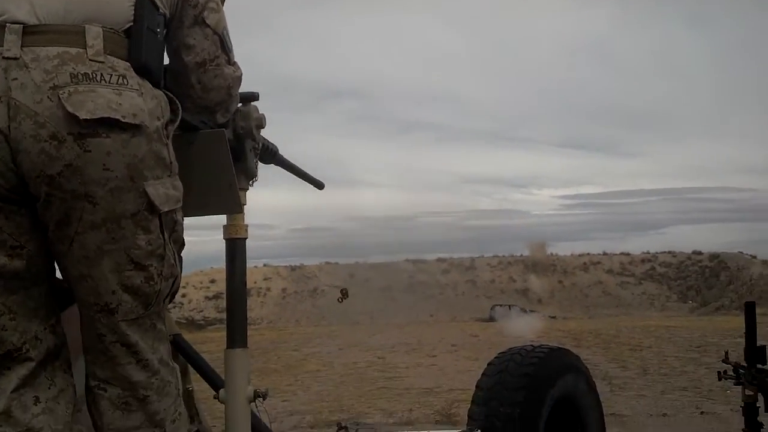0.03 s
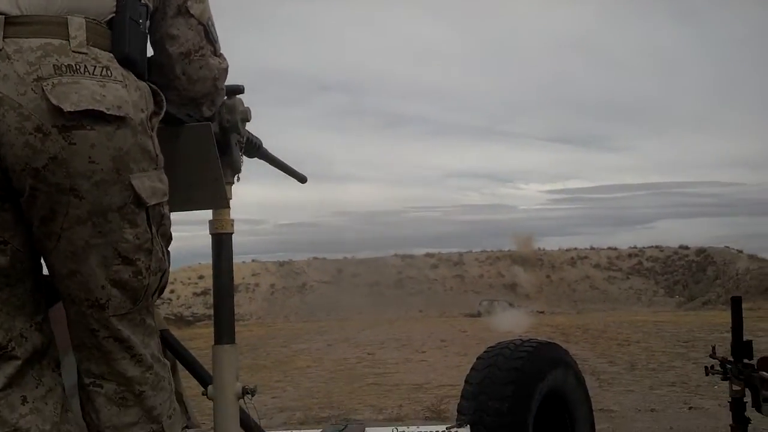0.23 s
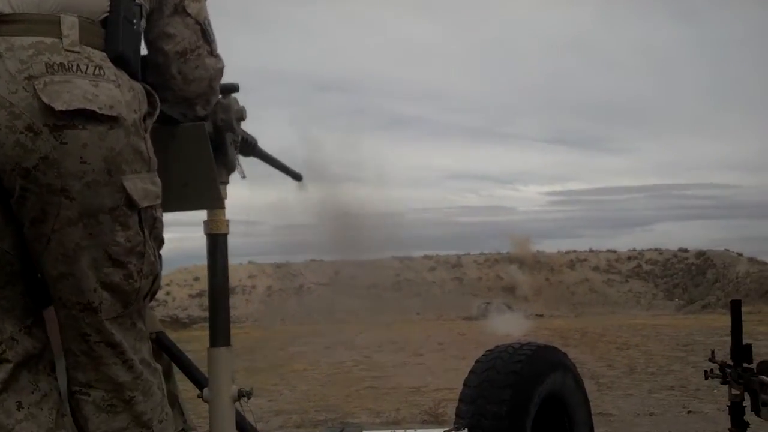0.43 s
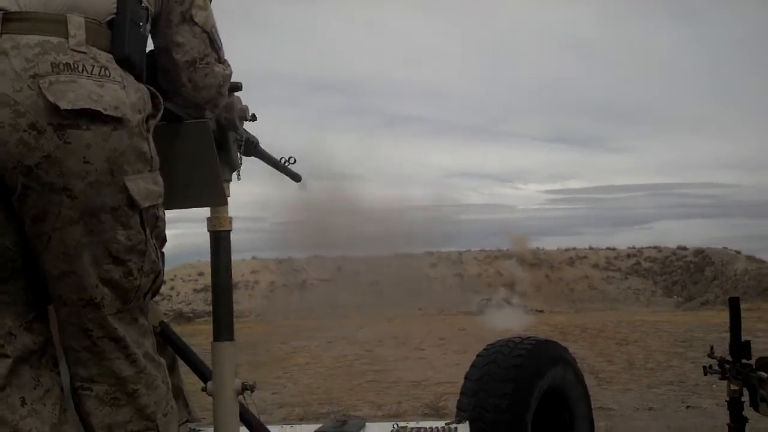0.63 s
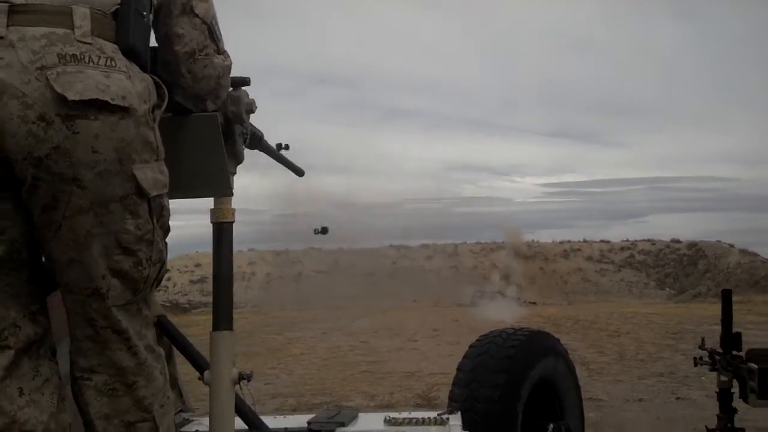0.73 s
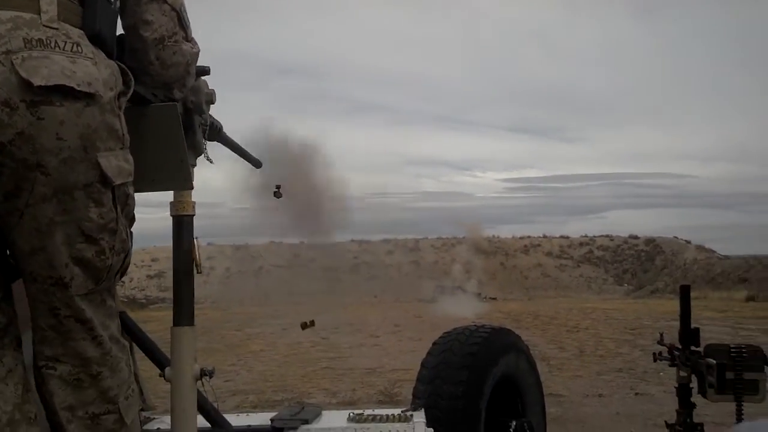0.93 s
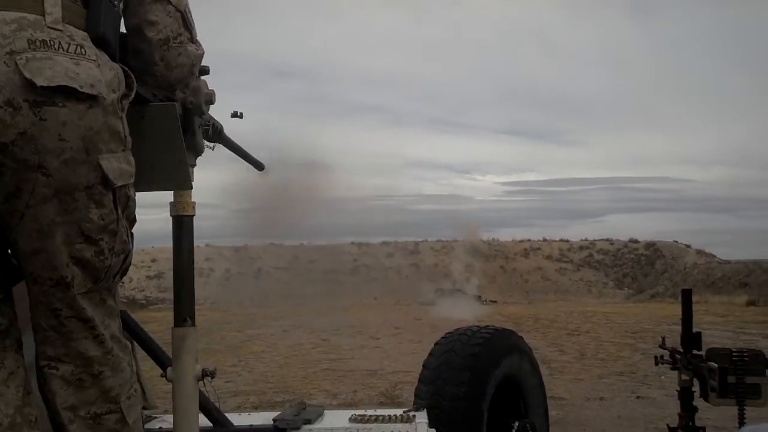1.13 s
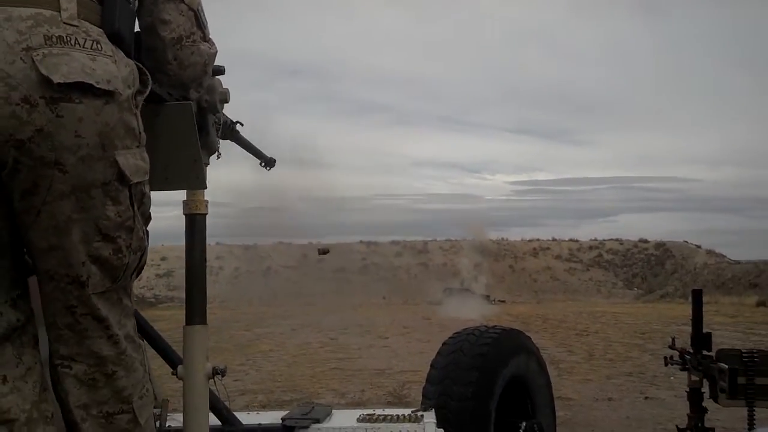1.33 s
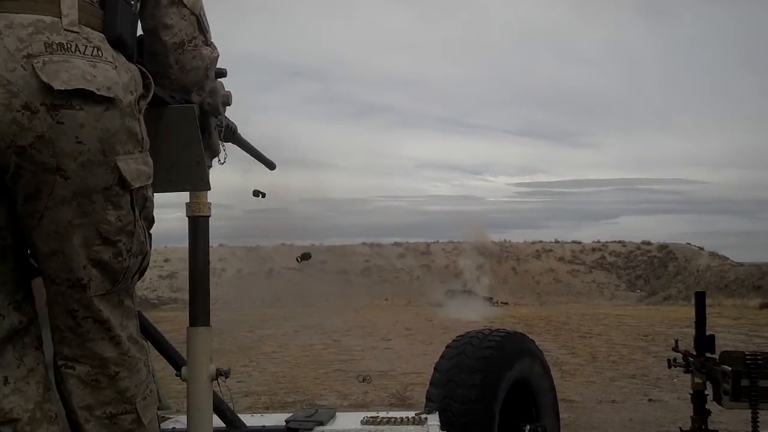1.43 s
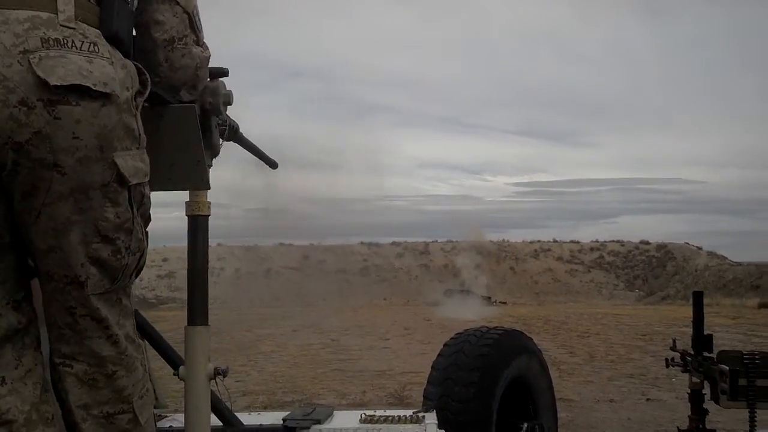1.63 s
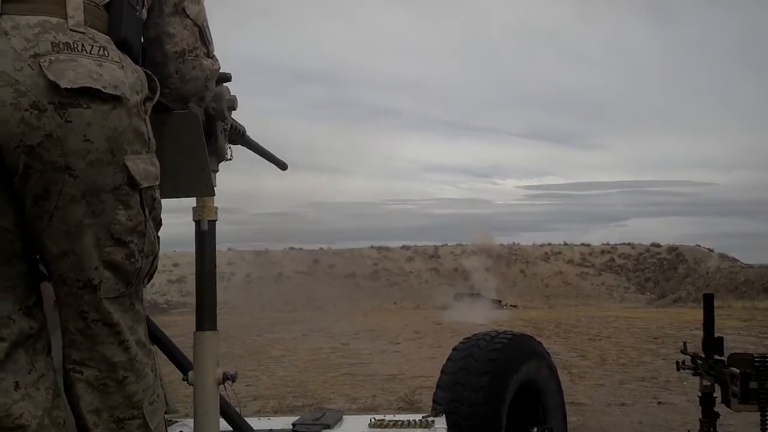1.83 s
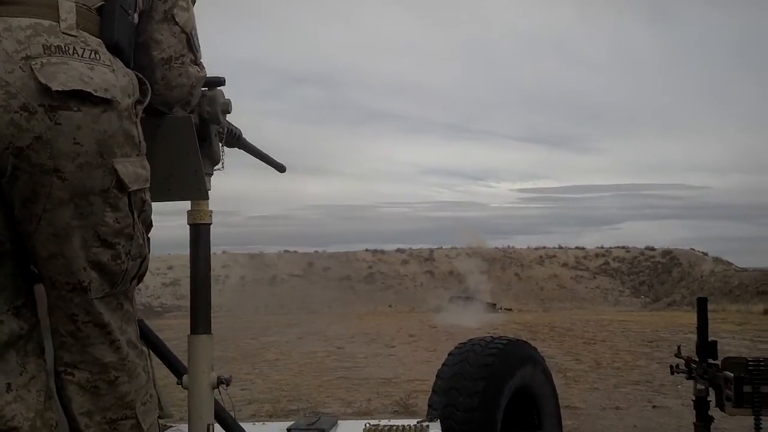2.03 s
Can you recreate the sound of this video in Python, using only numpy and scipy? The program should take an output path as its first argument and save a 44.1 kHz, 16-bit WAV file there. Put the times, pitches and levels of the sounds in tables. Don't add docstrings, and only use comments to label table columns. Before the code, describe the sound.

A heavy machine gun fires three short bursts very close to a slightly overloaded camera microphone on an open range; dull slaps return from a ridge while spent cases and links knock and ring on a vehicle deck.

```python
import sys
import numpy as np
from scipy import signal
from scipy.fft import rfft, irfft, next_fast_len
from scipy.io import wavfile
from scipy.ndimage import uniform_filter1d, map_coordinates

SR = 44100
rng = np.random.default_rng(int(sys.argv[2]) if len(sys.argv) > 2 else 0)


def waveform_to_disk(signal):
    frames = np.transpose(np.atleast_2d(signal))
    scaled = np.clip(frames, -1, 1) * 32767
    samples = np.round(scaled).astype(np.int16)
    wavfile.write(sys.argv[1], SR, samples)


def volts(x):
    e = np.asarray(x, float) / 20
    return 10 ** e


N = 92610
T = np.arange(N) / SR


def along(points, hz):
    f, v = np.transpose(points)
    return np.interp(np.log(hz + 1), np.log(f + 1), v)


def over_time(points):
    return np.interp(T, *np.transpose(points))


def filtered(x, response):
    m = next_fast_len(x.shape[-1] + 8192)
    return irfft(rfft(x, m) * response(np.fft.rfftfreq(m, 1 / SR)), m)[..., :x.shape[-1]]


def peak(f, hz, width):
    return 1j * f * width / (hz * hz - f * f + 1j * f * width)


def ports(pair, apart, response):
    y = filtered(pair, lambda f: response(f) * [np.ones_like(f), volts(along(apart, f))])
    return y / np.sqrt(np.mean(y[0] ** 2))


def noise(n, apart, points):
    return ports(rng.standard_normal((2, n)), apart, lambda f: volts(along(points, f)))


def swell(t, attack, hold, t60):
    fall = volts(-60 * np.clip(t - attack - hold, 0, None) / t60)
    return np.sin(np.clip(t / attack, 0, 1) * np.pi / 2) * fall


def add(out, s, x):
    i = round(s * SR)
    x = x[:, max(0, -i):N - i]
    out[:, max(i, 0):max(i, 0) + x.shape[1]] += x


# frequency in Hz, level in dB per Hz.
BRIGHT = [(800, 27), (3000, 5), (7000, 14.5), (10000, -31), (14500, -16), (16000, 31)]
# frequency in Hz, port difference over port sum in dB.
APART = [(40, -19), (150, -21.5), (400, -15), (900, -1), (2500, -0.5)]


def knock(db, hz, t60, bright_db, width):
    t = T[:SR // 3]
    body = ports(rng.standard_normal((2, len(t))), APART,
                 lambda f: peak(f, hz, 2 * width * hz) + 0.0071 * peak(f, 2.4 * hz, 2 * hz))
    wander = .03 * np.cumsum(rng.standard_normal(len(t)))
    tone = np.sin(2 * np.pi * hz * t + wander) * [[1], [.3]]
    tone = tone * (width < .5) * min(1, 620 / hz) ** .5
    edge_top_hz = 9000 * volts(bright_db / 2 + 5.5)
    edge = ports(rng.standard_normal((2, len(t))), APART,
                 lambda f: volts(along(BRIGHT, f)) / (1 + (f / edge_top_hz) ** 4))
    struck = swell(t, .0007, 0.051 * t60, t60) * (0.67 * body + tone)
    contact = volts(bright_db) * swell(t, 0.0011, 0.015 * t60, 1.43 * t60) * edge
    return volts(db) * (struck + contact)


# frequency in Hz, level in dB per Hz.
AIR = [(60, -28), (150, 12), (300, 15.5), (900, -7.5), (2500, -4.5), (5000, -24.5), (10000, -53),
       (15000, -24.5)]
# time in seconds, level in dB.
AIR_LEVEL = [(0, -32), (.16, -43.5), (.2, -42), (.42, -38), (1.45, -37), (2.1, -38.5)]
# frequency in Hz, level in dB per Hz.
RUMBLE = [(35, -10), (70, -14), (120, 30), (200, 21.5), (400, -38)]
# time in seconds, level in dB.
RUMBLE_LEVEL = [(0, -31), (.04, -34), (.09, -38), (.135, -32), (.18, -56), (.22, -56), (.26, -68),
                (.42, -55), (.8, -30.5), (1.5, -33), (1.75, -44), (1.97, -40), (2.03, -39), (2.1, -51)]


def air():
    uneven_db = [map_coordinates(rng.standard_normal(N // 1000), [T * 25]) for _ in range(2)]
    far = volts(over_time(AIR_LEVEL) + 0.37 * uneven_db[0])
    low = volts(over_time(RUMBLE_LEVEL) + uneven_db[1])
    return far * noise(N, APART, AIR) + low * noise(N, APART, RUMBLE)


# start in seconds, level in dB, pitch in Hz, T60 in seconds,
# brightness in dB.
KNOCKS = [(.001, -35.5, 700, 0.035, -13), (.037, -24.5, 596.5, 0.16, -40), (0.07, -51.5, 1500, 0.031, 25.5),
          (0.1756, -43.5, 1600, 0.15, -1), (0.2044, -21.5, 422, 0.095, -44), (.224, -27.5, 500, 0.088, -4),
          (0.251, -30, 1400, 0.13, -24), (0.267, -37, 900, 0.16, 12), (0.3763, -31, 1250, 0.089, 3.5),
          (.899, -28, 574, 0.17, -17), (0.949, -18, 560, 0.11, -28), (1.322, -33, 790, 0.093, -17),
          (1.4803, -34.5, 1565, 0.067, 5), (1.734, -37.5, 700, 0.19, -11), (1.856, -31, 1160, 0.042, -2),
          (1.873, -25.5, 1376, 0.096, -7), (1.914, -30.5, 1790, 0.077, -14), (1.962, -39, 900, 0.16, 8.5),
          (1.984, -40.5, 900, 0.11, -3), (2.007, -35, 1300, 0.14, -11), (2.066, -38, 612, 0.14, -3)]
# frequency in Hz, level in dB, T60 in seconds.
CASE = [(4760, -14.5, 0.58), (6300, -3, 1), (6395, -1, 0.4), (6700, -16, 0.21), (6560, -22, 0.22),
        (7470, -26, 0.83), (7490, -2, 0.2), (9930, -12, 0.24)]
# frequency in Hz, level in dB, T60 in seconds.
LINK = [(10460, -12, 0.2), (12200, -2, 0.16), (12770, -12, 0.12), (14360, -17, 0.3), (14500, -16, .25),
        (14960, -9, .2), (15260, -7, 0.1)]
# frequency in Hz, level in dB, T60 in seconds.
PLATE = [(3330, -12, .35), (5400, -6.5, 1), (7140, -4, 1), (12500, -5, 0.31)]
# start in seconds, level in dB.
CASES = [(-.04, -47), (.069, -52.5), (.25, -45.5), (.75, -62), (1.205, -38), (1.48, -41.5), (1.734, -36.5),
         (1.86, -49)]
# start in seconds, level in dB.
LINKS = [(.069, -42.5), (0.273, -35), (.85, -67), (1.25, -63), (1.325, -48), (1.51, -54), (1.80, -48),
         (1.875, -59), (1.975, -49)]
# start in seconds, level in dB.
PLATES = [(1.296, -43)]


def ringing(modes):
    t = T[:SR // 2]
    out = np.zeros((2, len(t)))
    for hz, level_db, t60 in modes:
        r = rng.standard_normal((4, 1))
        beat = 1 + 0.3 * np.sin(2 * np.pi * 25 * (1 + 0.385 * r[0]) * t + 3 * r[1])
        blur = .04 * np.cumsum(rng.standard_normal(len(t)))
        ring = np.sin(2 * np.pi * hz * (1 + 0.00207 * r[1]) * t + 3 * r[2:] + blur)
        out += volts(level_db + 4 * r[0]) * ring * beat * swell(t, 0.00089, 0.00075, t60)
    return out


def deck():
    out = np.zeros((2, N))
    for s, db, hz, t60, bright_db in KNOCKS:
        add(out, s, knock(db, hz, t60, bright_db, width=.3))
    for modes, drops in ((CASE, CASES), (LINK, LINKS), (PLATE, PLATES)):
        for s, db in drops:
            add(out, s, volts(db) * ringing(modes))
    return out


# start in
# seconds, level in dB, T60 in seconds.
TICKS = [(.069, -30, 0.039), (.1755, -39.5, 0.074), (.27, -47, .05), (.378, -30, .02),
         (.8295, -34.5, 0.013), (1.255, -31, .05), (1.325, -29.5, .05)]
# frequency in Hz, level in dB per Hz.
TICK = [(2000, -30), (4000, -18), (7000, 4.5), (10000, -9), (15000, 1), (17000, 4)]
# time in seconds, level in dB.
JINGLE = [(0, -70), (.17, -84), (.19, -54), (.42, -57.5), (.8, -60), (.98, -80), (1.2, -45), (1.42, -64.5),
          (1.7, -52.5), (2.1, -57)]


def jingle():
    per_s, low_hz, top_hz, ring_t60 = 400, 5000, 15700, .07
    shimmer_db, crack_db = 6, -21
    t = T[:SR // 20]
    r = rng.random((int(per_s * N / SR), 5))
    hz = low_hz + (top_hz - low_hz) * r[:, 1:2] ** .6
    at = (r[:, :1] * N).astype(int)
    level_db = over_time(JINGLE)
    size = volts(level_db[at] - 1.5 * np.log(r[:, 2:3]))
    rings = size * np.sin(2 * np.pi * hz * t) * swell(t, 0.00033, 0, ring_t60 * (.5 + r[:, 3:4]))
    when = (at + np.arange(len(t))).ravel()
    sides = (1, 2 * r[:, 4:] - 1)
    out = np.array([np.bincount(when, (rings * g).ravel(), N)[:N] for g in sides])
    out += volts(level_db + shimmer_db) * noise(N, APART, TICK)
    cracks = [(s, db + crack_db, .015) for s, db in ROUNDS]
    for s, db, t60 in TICKS + cracks:
        add(out, s, volts(db) * swell(t, .0003, .002, t60) * noise(len(t), APART, TICK))
    return out


# start in seconds, level in dB.
THUMPS = [(.035, -32), (0.141, -29), (.52, -20), (0.704, -17), (1.07, -14.5), (1.2, -27), (1.548, -14),
          (2.021, -21)]


def thumps():
    out = np.zeros((2, N))
    for s, db in THUMPS:
        out[0] += volts(db) * np.sin(2 * np.pi * 70 * (T - s)) * swell(T - s, 0.011, 0.0027, 0.029)
    return out


# frequency in Hz, level in dB per Hz.
GAS = [(100, -18), (600, -0.5), (2000, 0), (4500, -2), (7000, -5), (10000, -10.5), (14500, -8), (16000, -4)]


def gas():
    level = 0
    for s, db in ROUNDS:
        blast = swell(T - s, 0.001, 0.019, 0.25)
        tail = volts(-15) * swell(T - s, 0.0093, 0.051, 0.42)
        lead = volts(-1) * swell(T - s + 0.0042, 0.0023, 0.0022, 0.0071)
        level = level + volts(db) * (blast + tail + lead)
    return volts(-4) * level * noise(N, BOOM_APART, GAS)


# frequency in Hz, level in dB per Hz.
BOOM = [(40, -24), (130, -3), (330, -6), (800, -12), (1500, -14), (3000, -20), (7000, -29), (16000, -107)]
# frequency in Hz, port difference over port sum in dB.
BOOM_APART = [(40, -3), (150, -9), (400, -9), (800, -1.5), (2000, 0.5)]
# frequency in Hz, width in Hz, lift in dB.
MOUNT = [(420, 184, 8.5), (745, 104, 4), (1250, 24, -3), (205, 40, 6.5)]


def boom():
    reflections_per_s, scatter_db = 4000, 2.5
    level = 0
    for s, db in ROUNDS:
        near = swell(T - s - 0.0075, 0.017, 0.027, 0.16)
        tail = volts(-7.5) * swell(T - s, 0.0089, 0.057, 0.73)
        level = level + volts(db) * (near + tail)
    echoes = (rng.random((2, N)) < reflections_per_s / SR) * rng.standard_normal((2, N))
    echoes = echoes * volts(scatter_db * rng.standard_normal((2, N)))

    def mount(f):
        lifts = sum((volts(db) - 1) * peak(f, hz, w) for hz, w, db in MOUNT)
        return volts(along(BOOM, f)) * (1 + lifts)

    return volts(2) * level * ports(echoes, BOOM_APART, mount)


# start pitch in Hz, level in dB, delay in seconds,
# rise in seconds, hold in seconds.
GLIDES = [(519, 3, .012, 0.027, 0.038), (790, 1.5, .04, 0.012, 0.0065), (346.7, 3.5, 0.062, 0.0049, 0.0083),
          (1272, -11, 0.011, 0.0069, 0.022), (948, -21, .022, 0.014, 0.027),
          (834, -8, 0.08, 0.0047, 0.0087)]


def mount_answer(out, s, db):
    sag_per_s, t60, roughness = 2.407, 0.015, .25
    u = T[:SR // 6]
    for hz, glide_db, delay, rise, hold in GLIDES:
        rough = map_coordinates(rng.standard_normal((2, N // 400)), [[[0], [1]] + 0 * u, [u * 70] * 2])
        phase = 2 * np.pi * hz * (u - sag_per_s * u * u / 2) + 0.17 * rough[1]
        tone = (1 + roughness * rough[0]) * np.sin(phase)
        add(out, s + delay, volts(db + glide_db + 0.5) * tone * swell(u, rise, hold, t60) * [[1], [0]])


# start in seconds, strength in dB.
ROUNDS = [
    (0.4312, -16.5),
    (0.5473, -18),
    (0.646, -18),
    (0.9951, -17),
    (1.1149, -18.5),
    (1.547, -16),
]


def gun():
    push_db, push_s = -5, 0.0034
    lag_s, lag_top_hz = 0.00008, 900
    out = thumps() + gas() + boom()
    for s, db in ROUNDS:
        mount_answer(out, s, db)
        out[1] -= volts(db + push_db) * np.sin(np.pi * np.clip((T - s) / push_s, 0, 1)) ** 2
        add(out, s + 0.074, knock(db - 7, 700, 0.17, 5, width=1.0))
    out[1] += filtered(out[0], lambda f: -2j * np.pi * f * lag_s / (1 + (f / lag_top_hz) ** 2))
    return out


# start in seconds, peak level in dB, pitch in Hz, brightness in dB.
SLAPS = [
    (0.8297, -12.5, 1180, -9),
    (0.9279, -12, 531, -28),
    (1.2784, -10, 453, -27),
    (1.3959, -14, 263, -22.5),
    (1.8295, -18, 762, -30),
]


def ridge():
    t60, low_hz = 0.035, 158
    out, t = np.zeros((2, N)), T[:SR // 10]
    for s, db, hz, bright_db in SLAPS:
        stretched = t + np.minimum(t, .001)
        blast = -np.sin(2 * np.pi * hz * stretched) * swell(t, 0.00013, 0.00033, t60)
        blast += volts(-1) * np.sin(2 * np.pi * low_hz * t) * swell(t, 0.0044, 0.001, 0.023)
        add(out, s, volts(db) * blast * [[1], [.25]] * (500 / hz + 0.045))
        add(out, s, knock(db - 4.0, 0.627 * hz, t60, bright_db + 12.5, width=0.17))
        add(out, s, knock(db - 16.5, hz, 0.072, -29.5, width=0.5))
    return out


def scene():
    both, apart = air() + deck() + jingle() + gun() + ridge()
    return np.array([both + apart, both - apart])


# frequency in Hz, threshold against the neighbours in dB.
MASK = [(2700, -13), (5500, -11), (7800, -6), (8700, -3.5), (15000, -4)]
EDGES_HZ = SR / 2048 * np.r_[0, 96, 108, 120, 132, 144, 160, 176, 196, 216, 240, 264, 292, 320:960:32]


def thinned(x):
    quiet_db = -99
    hz, _, z = signal.stft(x, SR, nperseg=2048)
    starts = np.searchsorted(hz, EDGES_HZ)
    widths = np.diff(np.r_[starts, len(hz)])
    power = np.add.reduceat(np.abs(z) ** 2, starts, axis=1) * 12 / widths[:, None]
    band = np.repeat(power, widths, axis=1)
    around = uniform_filter1d(band.mean(0), size=128, axis=0)
    mask = around * volts(along(MASK, hz))[:, None] ** 2 + volts(quiet_db) ** 2
    keep = np.where(hz[:, None] < 2000, 1, band ** 6 / (band ** 6 + mask ** 6 + 1e-300))
    return signal.istft(z * keep, SR, nperseg=2048)[1][:, :N]


def top_cut(x):
    return signal.sosfilt(signal.butter(12, 16880, fs=SR, output="sos"), x)


def record(dry):
    overload, hardness, lag = 0.77, 1.57, 16
    low_hz, top_hz, leak = 87, 15850, .01
    x = dry / (1 + np.abs(dry / overload) ** hardness) ** (1 / hardness)
    x = x - np.pad(x[::-1], ((0, 0), (lag, 0)))[:, :N]

    def cut(f):
        band = (f < top_hz) + leak * (f < 16900)
        return band * np.array([1j * f / (low_hz + 1j * f), np.ones_like(f)])

    mid, side = thinned(filtered(np.array([x[0] + x[1], x[0] - x[1]]) / 2, cut))
    return top_cut(np.clip([mid + side, mid - side], -1, 1))


dry = scene()
out = record(dry)
waveform_to_disk(out)
```